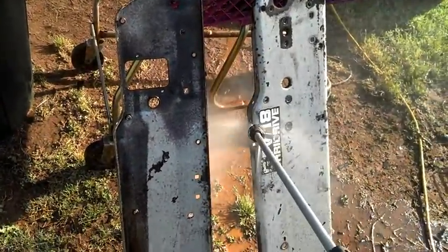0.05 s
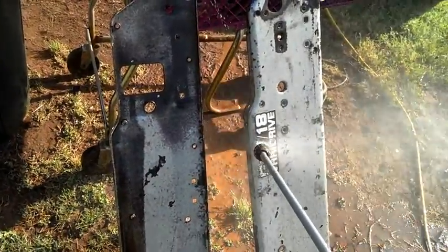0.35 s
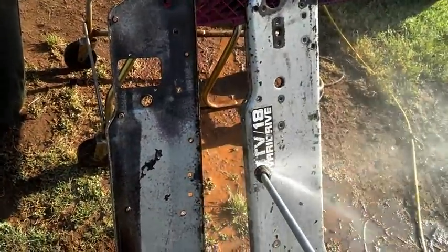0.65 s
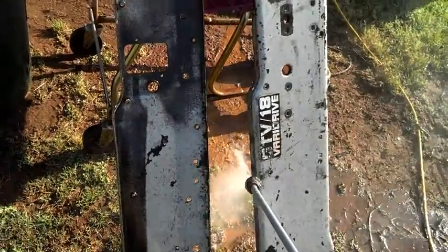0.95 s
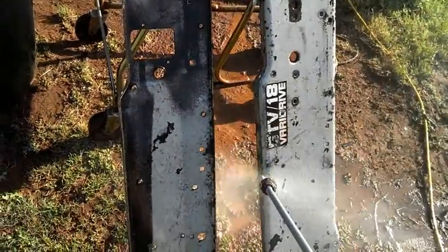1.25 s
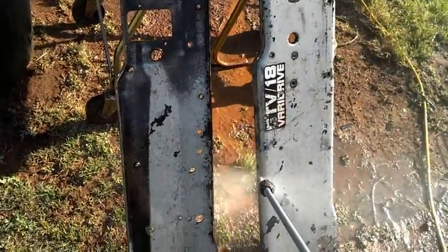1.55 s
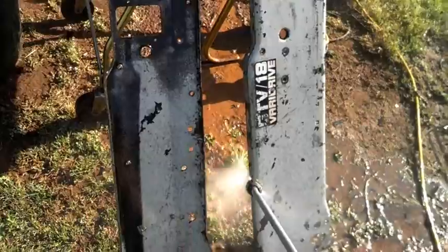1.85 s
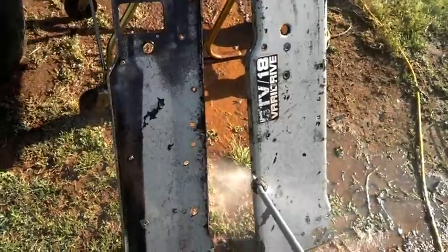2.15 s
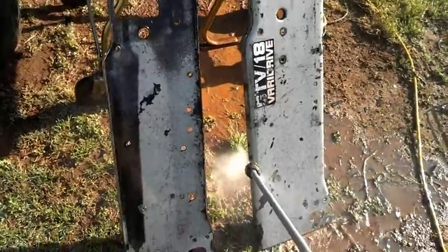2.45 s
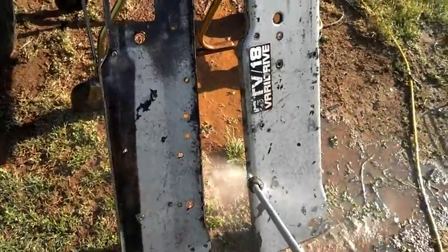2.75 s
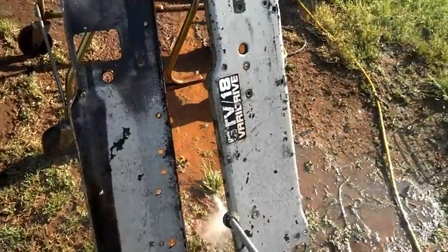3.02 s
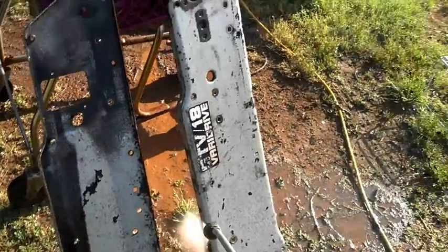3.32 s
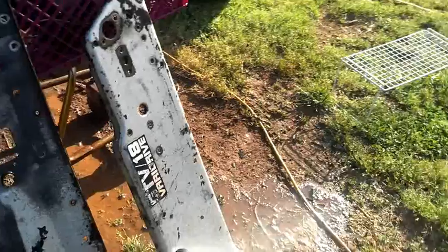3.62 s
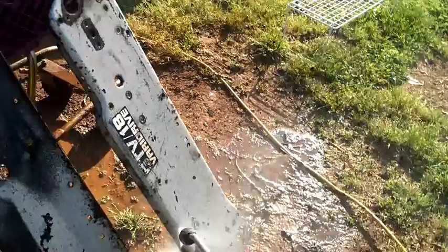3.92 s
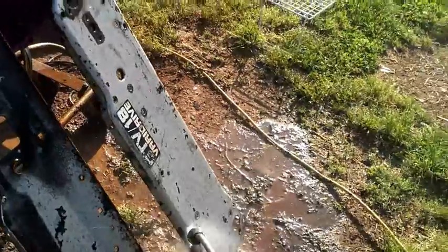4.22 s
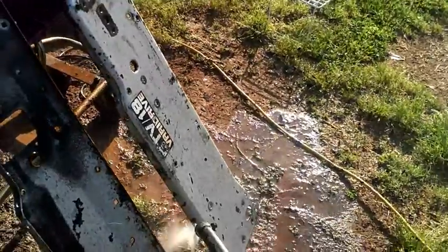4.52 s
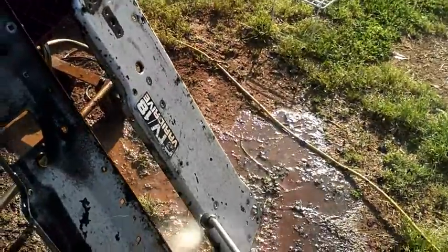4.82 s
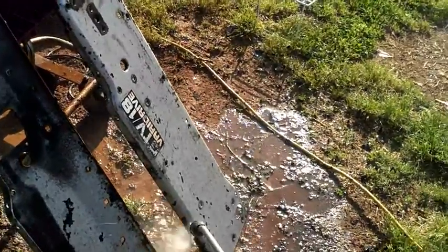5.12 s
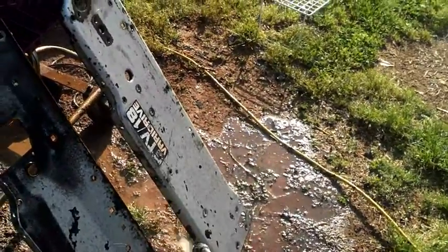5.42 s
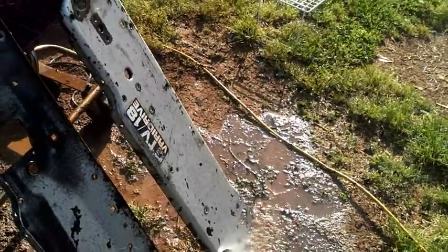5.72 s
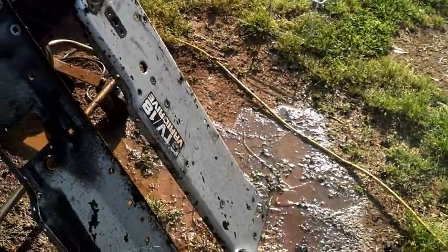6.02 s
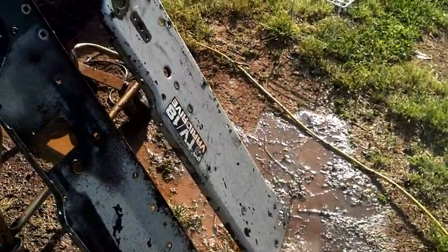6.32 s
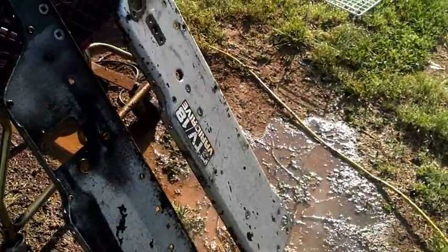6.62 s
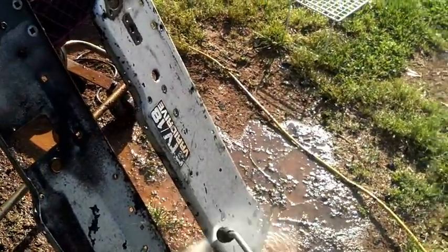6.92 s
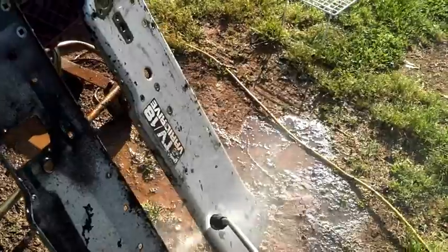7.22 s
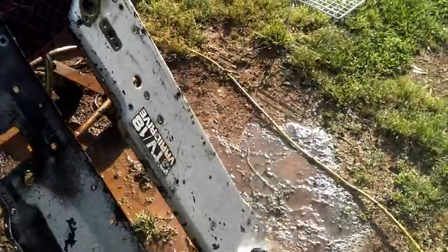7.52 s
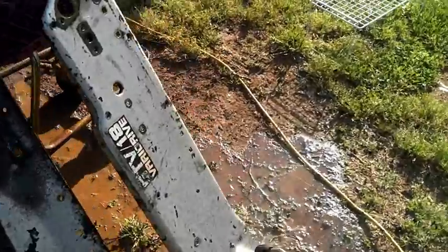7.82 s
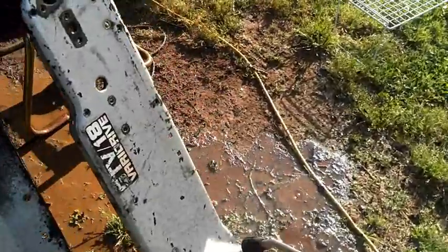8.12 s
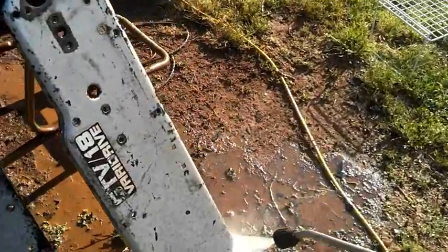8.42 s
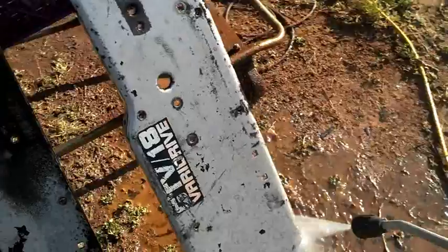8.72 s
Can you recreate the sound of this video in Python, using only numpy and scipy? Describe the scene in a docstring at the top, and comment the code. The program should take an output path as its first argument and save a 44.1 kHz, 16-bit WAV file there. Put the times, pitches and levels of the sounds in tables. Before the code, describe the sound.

A pressure washer hums and whines steadily while its water jet hisses and drums on a steel rail outdoors.

```python
"""Pressure washer on a steel rail

A water jet sweeps along a rail in a yard: its impact drums on the steel, its drops splash and hiss, it
flares or falters at edges and once excites a hollow into a roar. The electric motor hums and whines at
harmonics of its steady shaft speed, and the geared piston pump drones and makes the water throb.
Cooling air rushes behind them, and eddies buffet the two ports of a hand-held stereo microphone."""
import sys
import numpy as np
from scipy import signal
from scipy.fft import rfft, irfft, next_fast_len
from scipy.io import wavfile
from scipy.ndimage import uniform_filter1d, map_coordinates

SR = 44100
rng = np.random.default_rng(int(sys.argv[2]) if len(sys.argv) > 2 else 0)


def wrap_up_sound(samples):
    """Save the sound to the file named by the first command line argument, as 16-bit audio."""
    columns = np.atleast_2d(samples).T
    # keep every value between -1 and 1, then stretch to whole-number steps
    tamed = np.clip(columns, -1, 1)
    steps = np.round(tamed * 32767).astype(np.int16)
    wavfile.write(sys.argv[1], SR, steps)


N = 385875

# Levels are relative. Mid is what the two ports share; side is how they differ.
# how squarely the jet strikes the rail: time_s, drum_db, splash_db
IMPACT_LEVELS = [(0, -35.5, -37), (0.2, -38.5, -37.5), (0.6, -38, -36.5), (1.1, -31.5, -33.5),
                 (1.55, -33, -34.5), (1.85, -29, -32), (2.35, -30.5, -33), (2.9, -30, -35),
                 (3.5, -33, -35.5), (4.5, -33, -35.5), (5.15, -33.5, -34.5), (5.6, -35, -37),
                 (6.6, -33.5, -35.5), (7.3, -35.5, -37), (7.9, -31, -32.5), (8.3, -30.5, -33),
                 (8.75, -31, -34)]
# the jet in the air: time_s, hiss_db, mist_db
JET_LEVELS = [(0, -44.5, -42.5), (0.3, -48, -39), (0.85, -46, -42), (1.2, -44.5, -37.5), (2.0, -40, -38),
              (2.85, -40.5, -38), (4.1, -38, -37), (5.5, -38, -38), (7.1, -39, -38), (8.25, -37.5, -35),
              (8.75, -40.5, -40.5)]
# changes as the jet clips an edge or hole: centre_s, length_s, drum_db, splash_db, hiss_db, mist_db
EDGE_FLARES = [(0.04, 0.15, 2, 0.5, 7.5, 6), (0.14, 0.1, -3, -2.5, 0.5, 5),
               (0.487, 0.45, 2.5, -0.5, 3.5, 4), (2.427, 0.22, 1, 0, 1.5, 0),
               (3.203, .1, 1.5, 1.5, -1, -1.5), (3.37, 0.28, -0.5, -2, 1, 3),
               (3.66, .15, -0.5, -1.5, 1, -1), (4.486, .18, 0.5, 0, 2, 1),
               (4.66, 0.1, -2.5, 1.5, 0.5, -2.5), (5.345, 0.2, 0, -4.5, -2.5, 6),
               (5.76, 0.16, 2.5, 1, 1.5, 5), (5.94, 0.13, 0, -0.5, -1, -1), (6.108, 0.15, 4, 3.5, 2.5, 3.5),
               (6.21, 0.07, -6, 0, 3.5, 2), (6.387, 0.23, 0, 1.5, 5, 3), (6.82, 0.15, 1, 0.5, 1, -1.5),
               (7.403, 0.35, 2, -2.5, 4.5, 0), (7.525, 0.061, -4, 8.5, 2, 0),
               (7.845, 0.39, 1.5, -5.5, 2.5, 0)]
# spectra of the struck steel, hollow, splash, hiss and fine mist: frequency_hz, density_db
DRUM_SPECTRUM = [(60, -75), (130, -40), (180, -19.5), (240, -10), (350, -2.5), (500, -2), (640, -0.5),
                 (780, -0.4), (980, -4.5), (1100, -4), (1260, -14), (1600, -14), (3000, -54)]
HOLLOW_SPECTRUM = [(120, -51), (300, -15), (420, -1), (520, 3), (640, -3.5), (850, 0), (1200, -8.5),
                   (2000, -10.5), (4000, -36)]
SPLASH_SPECTRUM = [(150, -56), (350, -21), (700, -8.5), (1100, 1), (1260, -0.5), (1550, -1), (1950, -7),
                   (2400, -7.5), (3200, -24.5), (5000, -11.5), (10000, -67)]
HISS_SPECTRUM = [(150, -69), (1500, -5.5), (2700, -6), (3900, -3), (4900, 1), (5800, 5), (6700, 3.5),
                 (7400, 0), (8600, -4), (11000, -3.5), (16000, -49)]
MIST_SPECTRUM = [(200, -80), (4000, -29), (7200, -4.5), (8700, 2.5), (9500, 1), (10500, -1), (11800, -3.5),
                 (13000, -3.5), (15700, -3)]
# how far a rush differs between the ports: frequency_hz, side_re_mid_db
RUSH_WIDTH = [(200, -13.5), (600, -6.5), (1000, 0), (2000, 1), (2700, -1.5), (3500, 0), (6000, -0.5),
              (15000, -0.5)]

# motor hum at the microphone: time_s, fundamental_mid_db, fundamental_side_db, overtones_db
HUM_LEVELS = [(0.0, -38, -54, -44), (0.4, -39, -54, -44), (1.0, -36, -54, -42), (2.35, -33.5, -49.5, -39.5),
              (3.2, -35, -51.5, -41), (3.5, -37, -63, -41), (4.3, -37, -57, -41.5),
              (5.0, -37.5, -54, -41.5), (5.8, -38.5, -56, -45), (6.5, -39.5, -52.5, -42.5),
              (7.3, -38, -55, -42.5), (7.7, -35, -66, -41), (8.15, -33.5, -51, -37),
              (8.75, -41, -53, -42.5)]
# the hum drifts rightwards as the microphone turns: time_s, side_lag_rad
HUM_SIDE_LAG = [(3.5, 0), (4.3, 1.05), (7.3, 1.3), (7.7, 0), (8.2, 0), (8.75, 0.58)]
# high motor tones: time_s, whine_mid_db, whine_side_db, whistle_mid_db, whistle_side_db
FAN_LEVELS = [(0, -68, -45, -64, -44), (0.6, -62, -43.5, -60, -43), (1.0, -50, -42, -51, -41.5),
              (1.5, -48, -40, -47, -40.5), (2.1, -47.5, -39.5, -47.5, -39.5), (2.45, -48, -40, -43.5, -40),
              (2.75, -48, -40.5, -47.5, -40), (3.35, -52, -38.5, -51, -40), (3.65, -48.5, -42, -44.5, -41),
              (4.25, -46.5, -40, -42, -41.5), (5.0, -48, -40, -46, -42), (5.5, -56, -41, -53, -43.5),
              (6.15, -44.5, -43, -49, -48), (6.8, -47, -42, -51, -48.5), (7.2, -52, -39.5, -44.5, -43),
              (7.5, -48, -39, -50, -41.5), (7.95, -58, -43, -50, -37), (8.35, -54, -42.5, -51, -47),
              (8.65, -46, -44, -51, -50)]
# harmonics of the motor shaft, in groups from low to high: order, level_db, side_re_mid_db
HUM_ORDERS = [(2, 0.5, -12), (3, -11, -10), (4, -5, -7)]
WHINE_ORDERS = [(10, -11, 0), (11, 0.5, 0)]
WHISTLE_ORDERS = [(12, 0.7, -0.7), (13, -12, -8), (15, -14, -10)]
SHRILL_ORDERS = [(21, -15, 10), (22, -0.5, 2), (32, -12, -1)]
# difference tone of the fourth harmonic and the mains ripple: order, level_db, side_re_mid_db
RIPPLE_ORDERS = [(1, -10.5, -3)]
# pump drone at the microphone: time_s, level_db
PUMP_LEVELS = [(0, -42), (0.6, -43.5), (1.5, -38.5), (2.5, -34.5), (3.6, -35.5), (4.5, -34), (5.5, -36.5),
               (6.5, -38), (7.5, -36.5), (8.75, -35.5)]
# harmonics of the pump crank: order, level_db, side_re_mid_db
PUMP_ORDERS = [(2, -34, -14), (3, -16.5, -10.5), (4, -18.5, -6), (5, -24, -11), (6, -12, -6), (8, -26, -8),
               (9, -14, -3), (11, -17, -2), (14, -7, -17), (15, -23, -6), (16, -25, -5), (17, -15.5, -2)]
# how openly the microphone faces the washer: time_s, gain_db
FACING_GAIN = [(0, -40), (1, -2.5), (3, -2), (3.6, 4.5), (7.2, 1.5), (7.9, 1), (8.75, 3.5)]

# spectra of the cooling air and of wind on the ports: frequency_hz, density_db
COOLING_SPECTRUM = [(50, -45), (90, -16), (120, -16), (200, -1.5), (400, -1.5), (1500, -0.5), (2600, -5),
                    (3400, -2.5), (4400, -1.5), (8000, -19)]
WIND_SPECTRUM = [(20, -25), (50, -7), (80, -5), (115, 0.5), (160, 0), (250, -1), (600, -43)]
# air moving over the ports: time_s, level_db
WIND_LEVELS = [(0, -56), (0.5, -64), (0.8, -55), (1.4, -59), (1.75, -59), (2.0, -62), (2.9, -61),
               (3.2, -52), (3.55, -48), (3.7, -62), (4.2, -66), (5.2, -80), (6.4, -73), (6.9, -61),
               (7.0, -52), (7.25, -56), (7.6, -65), (8.15, -55), (8.35, -65), (8.6, -50), (8.75, -50)]
# single eddies striking a port: centre_s, peak_db, pitch_hz
EDDIES = [(0.05, -56, 130), (0.215, -50, 109), (0.31, -48, 100), (0.389, -50, 115), (2.625, -46, 115),
          (2.712, -53, 130), (3.068, -40.5, 115), (3.16, -45, 150), (3.255, -43, 135), (3.3, -42.5, 100),
          (3.365, -40, 140), (3.407, -39, 121), (3.5, -46, 115), (3.528, -38, 110), (3.577, -42, 90),
          (5.21, -50, 125), (6.965, -46, 110), (7.012, -44, 115), (7.09, -57, 125), (7.345, -39.5, 120),
          (8.135, -50, 130), (8.19, -41, 115), (8.6, -40.5, 120)]
# moments when the treble draws to the centre: start_s, length_s
NARROW_SPANS = [(0.092, 0.17), (0.422, 0.081), (0.643, 0.094), (0.837, 0.067), (1.438, 0.12), (1.856, 0.13),
                (2.088, 0.12), (2.512, 0.066), (2.922, .09), (3.292, .14), (3.572, 0.081), (3.76, .18),
                (4.407, .18), (4.735, 0.083), (4.916, 0.33), (5.335, 0.17), (5.573, 0.2), (5.993, 0.11),
                (6.822, .13), (7.03, 0.39), (7.91, 0.15), (8.492, 0.14)]

SHAFT_HZ, SHAFT_DRIFT_HZ = 294.4, 0.2  # a steady load holds the speed nearly constant
GEAR_RATIO = 0.2199  # crank turns per shaft turn
RIPPLE_HZ = 100  # twice the mains frequency
THROB_DB = 0.35  # swing of the spray with each crank turn
HOLLOW_START_S, HOLLOW_ATTACK_S, HOLLOW_HOLD_S, HOLLOW_RELEASE_S = 7.39, 0.19, 0.13, 0.15
HOLLOW_DB = -29
EDDY_CYCLES = 2  # length of a thump
NARROW_MID_DB, NARROW_SIDE_DB = 1.5, -14
NOTCH_HZ, NOTCH_HALF_WIDTH_HZ, TOP_HZ = 2830, 300, 15800


def water_jet(throb_db):
    """Random impacts sum to broadband noise: the steel drums, and drops give splash, hiss and mist."""
    flares_db = sum(np.outer(change_db, swell(s, length)) for s, length, *change_db in EDGE_FLARES)
    drum_db, splash_db, hiss_db, mist_db = flares_db + [*curves(IMPACT_LEVELS), *curves(JET_LEVELS)]
    flutter_db = 0.4 * wobble(40)  # the fan of water breaks up unevenly
    sway_db = 0.41 * wobble(9)  # the hand never holds the lance quite still
    impact_db = throb_db + sway_db
    airborne_db = impact_db + flutter_db
    drum = amp(drum_db - 2.5 + impact_db) * rush(DRUM_SPECTRUM, patchy_db=0.37, spiky_db=0.8, lean=0.8)
    splash = rush(SPLASH_SPECTRUM, patchy_db=1.0, spiky_db=0.9, lean=0.075)
    splash *= amp(splash_db - 0.6 + impact_db)
    hiss = rush(HISS_SPECTRUM, patchy_db=1.2, spiky_db=0.9, lean=0.073)
    hiss *= amp(hiss_db + 2.0 + airborne_db)
    mist = rush(MIST_SPECTRUM, patchy_db=1.05, spiky_db=1.0, lean=0.12)
    mist *= amp(mist_db + 4.5 + airborne_db)
    return drum + splash + hiss + mist


def hollow_roar(throb_db):
    """Cavity resonance: a hollow at the end of the rail roars while the jet catches it."""
    corners_s = HOLLOW_START_S + np.cumsum([0, HOLLOW_ATTACK_S, HOLLOW_HOLD_S, HOLLOW_RELEASE_S])
    envelope = np.interp(np.arange(N) / SR, corners_s, [0, 1, 1, 0])
    return envelope * amp(HOLLOW_DB + throb_db) * rush(HOLLOW_SPECTRUM, patchy_db=0, spiky_db=3, lean=1)


def motor_hum(shaft, crank):
    """Amplitude modulation: each crank turn loads the hum, and the mains ripple adds a sideband."""
    mid_db, side_db, overtone_db = curves(HUM_LEVELS)
    load = 1 + 0.2 * np.sin(2 * np.pi * crank)
    phase = 2 * np.pi * shaft + 0.03 * wobble(3.7) - np.outer([0, 1], curves(HUM_SIDE_LAG)[0])
    fundamental = np.sqrt(2) * amp(0.41 * wobble(5) - 0.5 + [mid_db, side_db]) * np.sin(phase)
    overtones = amp(overtone_db) * tones(shaft, HUM_ORDERS, waver_db=-0.1, rate_hz=4.6, scatter_rad=0.04)
    beat = 4 * shaft - RIPPLE_HZ * np.arange(N) / SR
    ripple = amp(overtone_db) * tones(beat, RIPPLE_ORDERS, waver_db=2.5, rate_hz=5, scatter_rad=0.15)
    return load * (fundamental + overtones) + ripple


def pump_drone(crank):
    """Periodic forcing: the pistons radiate harmonics of the crank speed."""
    level = amp(curves(PUMP_LEVELS)[0])
    return level * tones(crank, PUMP_ORDERS, waver_db=2, rate_hz=4, scatter_rad=0.16)


def fan_whine(shaft):
    """Rotational tones: the motor's fan and rotor sound at high multiples of the shaft speed."""
    whine_db, whistle_db = np.reshape(curves(FAN_LEVELS), (2, 2, N))
    shrill_db = curves(FACING_GAIN)[0] - 53
    whine = amp(whine_db) * tones(shaft, WHINE_ORDERS, waver_db=2, rate_hz=45, scatter_rad=0.3)
    whistle = amp(whistle_db) * tones(shaft, WHISTLE_ORDERS, waver_db=1.6, rate_hz=35, scatter_rad=0.22)
    shrill = amp(shrill_db) * tones(shaft, SHRILL_ORDERS, waver_db=1.8, rate_hz=4, scatter_rad=0.4)
    return whine + whistle + shrill


def cooling_air():
    """Flow noise: the motor's cooling air rushes from the side, louder as the microphone faces it."""
    level = amp(curves(FACING_GAIN)[0] + [[-42], [-37]])
    return level * rush(COOLING_SPECTRUM, patchy_db=1.5, spiky_db=1.5, lean=0)


def wind_buffet():
    """Turbulent pressure rumbles differently at each port; single eddies thump one or the other."""
    level = amp(curves(WIND_LEVELS)[0] - 4.5 + 6.5 * wobble(20))
    rumble = unit(filtered(rng.standard_normal((2, N)), lambda hz: gain_at(WIND_SPECTRUM, hz)))
    wind = level * rumble * amp([[-3], [0]])
    t = np.arange(N) / SR
    for (s, db, hz), (phase, port) in zip(EDDIES, rng.random((len(EDDIES), 2))):
        eddy = amp(db) * swell(s, EDDY_CYCLES / hz) * np.sin(2 * np.pi * (hz * (t - s) + phase))
        wind += np.outer([np.sign(port - 0.5), 1], eddy)
    return wind


def rush(spectrum, patchy_db, spiky_db, lean):
    """Mid and side of modulated noise, spiky and in drifting patches; lean biases it to the left port."""
    noise = rng.standard_normal((2, N)) * amp(spiky_db * wobble(2500))
    bins = signal.stft(noise, nperseg=1024)[2]
    patches = uniform_filter1d(rng.standard_normal(bins.shape[1:]), size=9, axis=0)
    patches = unit(uniform_filter1d(patches, size=12, axis=1))
    pair = signal.istft(bins * amp(patchy_db * patches), nperseg=1024)[1][:, :N]
    mid, independent = unit(filtered(pair, lambda hz: gain_at(spectrum, hz)))
    side = (independent + lean * mid) / np.hypot(1, lean)
    return np.array([mid, filtered(side, lambda hz: gain_at(RUSH_WIDTH, hz))])


def tones(turns, orders, waver_db, rate_hz, scatter_rad):
    """Mid and side of a rotation's harmonics; reflections make each waver in level and phase."""
    pair = np.zeros((2, N))
    for order, db, side_db in orders:
        phase = 2 * np.pi * (np.round(order) * turns + rng.random()) + scatter_rad * wobble(rate_hz)
        waver = np.array([wobble(rate_hz), wobble(rate_hz)])
        pair += np.sqrt(2) * amp(db + waver_db * waver + [[0], [side_db]]) * np.sin(phase)
    return pair


def narrowed(mid, side):
    """Stereo width follows the side-to-mid ratio: at times the treble draws to the centre."""
    t = np.arange(N) / SR
    gate = sum(1.0 * ((t > s) & (t < s + length)) for s, length in NARROW_SPANS)
    centred = uniform_filter1d(gate, size=900)
    pair = np.array([mid, side])
    treble = filtered(pair, lambda hz: 1 / (1 + (4600 / (hz + 1)) ** 16))
    return pair + centred * (amp([[NARROW_MID_DB], [NARROW_SIDE_DB]]) - 1) * treble


def amp(db):
    """Amplitude ratio of a level in decibels."""
    return 10 ** (np.asarray(db) / 20)


def unit(x):
    """Normalisation to an rms of 1."""
    return x / np.sqrt(np.mean(x ** 2) + 1e-20)


def gain_at(spectrum, hz):
    """Gain of a decibel spectrum, interpolated on a logarithmic frequency axis."""
    knots_hz, db = np.transpose(spectrum)
    return amp(np.interp(np.log(hz + 1), np.log(knots_hz + 1), db))


def curves(rows):
    """Linear interpolation, sample by sample, of each column after the time."""
    times_s, *columns = np.transpose(rows)
    return [np.interp(np.arange(N) / SR, times_s, column) for column in columns]


def wobble(rate_hz):
    """Smooth random modulation: a spline through rate_hz knots a second."""
    knots = rng.standard_normal(int(N * rate_hz / SR) + 4)
    return map_coordinates(knots, [np.arange(N) * rate_hz / SR], mode="nearest")


def swell(centre_s, length_s):
    """Gaussian envelope of height 1."""
    return np.exp(-(2 * (np.arange(N) / SR - centre_s) / length_s) ** 2)


def filtered(x, response):
    """Linear filtering: the spectrum is multiplied by a complex frequency response."""
    size = next_fast_len(N + SR // 2)
    return irfft(rfft(x, size) * response(np.fft.rfftfreq(size, 1 / SR)), size)[..., :N]


def scene():
    """Superposition of washer, water and air at the left and right ports."""
    shaft = np.cumsum(SHAFT_HZ + SHAFT_DRIFT_HZ * wobble(2)) / SR  # angle in turns
    crank = GEAR_RATIO * shaft
    throb_db = THROB_DB * np.cos(2 * np.pi * crank)
    washer = motor_hum(shaft, crank) + pump_drone(crank) + fan_whine(shaft) + cooling_air()
    mid, side = washer + water_jet(throb_db) + hollow_roar(throb_db) + wind_buffet()
    return np.array([mid + side, mid - side])


def record(dry):
    """Comb filtering: the microphone widens its stereo by taking each port, delayed, from the other."""
    lag_s, feedback = 16 / SR, 0.25  # feedback narrows the notches of the mid
    delay = lambda hz: np.exp(-2j * np.pi * hz * lag_s)
    mid_comb = lambda hz: (1 - delay(hz)) * (1 + feedback) / 2 / (1 - feedback * delay(hz))
    notch = lambda hz: 1 - 1 / (1 + ((hz - NOTCH_HZ) / NOTCH_HALF_WIDTH_HZ) ** 6)
    mid = filtered((dry[0] + dry[1]) / 2, mid_comb)
    mid = filtered(mid, notch)  # the centre of the sound is hollowed out around 2.8 kHz
    side = filtered((dry[0] - dry[1]) / 2, lambda hz: (1 + delay(hz)) / 2)
    mid, side = narrowed(mid, side)
    side = side - filtered(mid, lambda hz: 0.17 / (1 + hz / 9000))  # the right is a little louder
    bass = lambda hz: 1 + 520 / (1j * hz + 25)  # restores the lows that the comb cancels
    return filtered(np.array([mid + side, mid - side]), lambda hz: bass(hz) * (hz < TOP_HZ))


dry = scene()
out = record(dry)
wrap_up_sound(out)
```